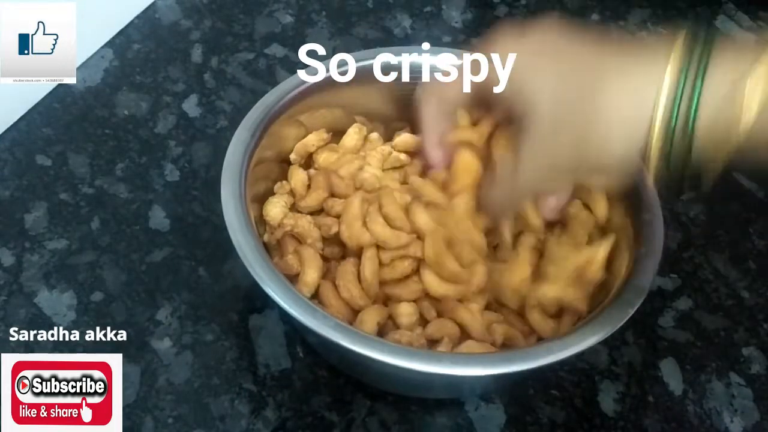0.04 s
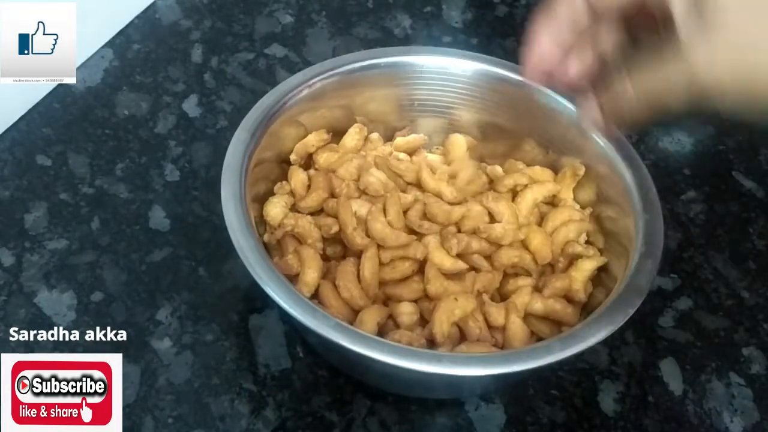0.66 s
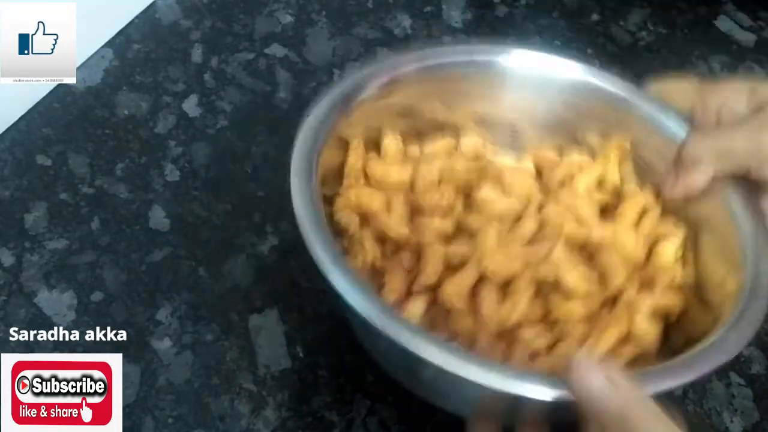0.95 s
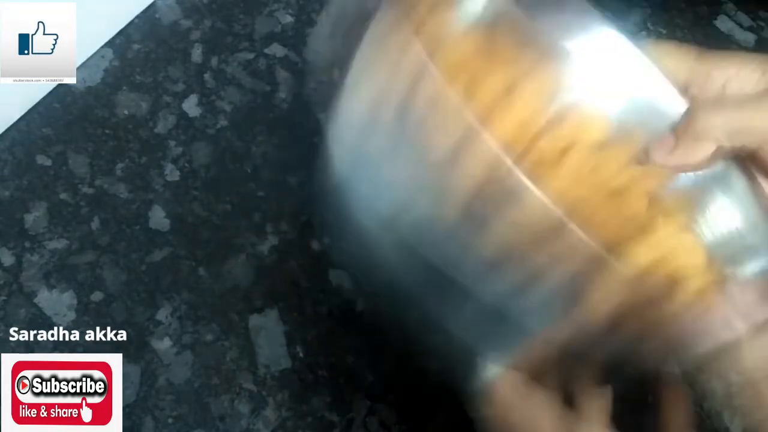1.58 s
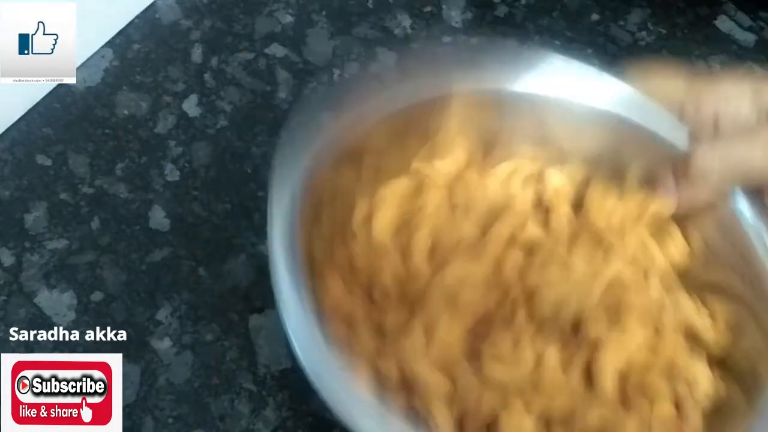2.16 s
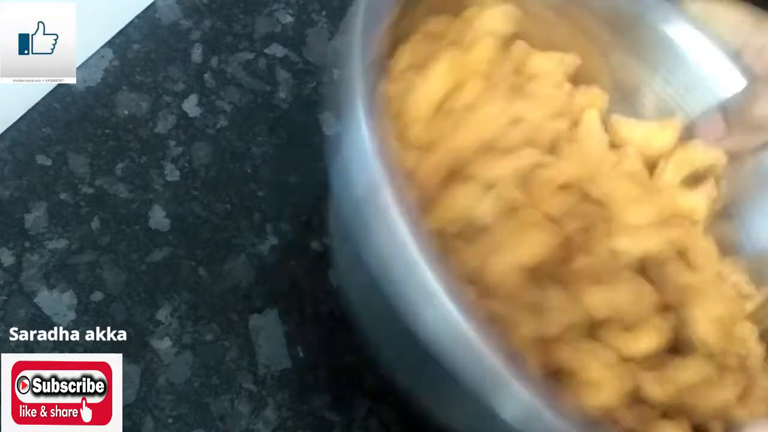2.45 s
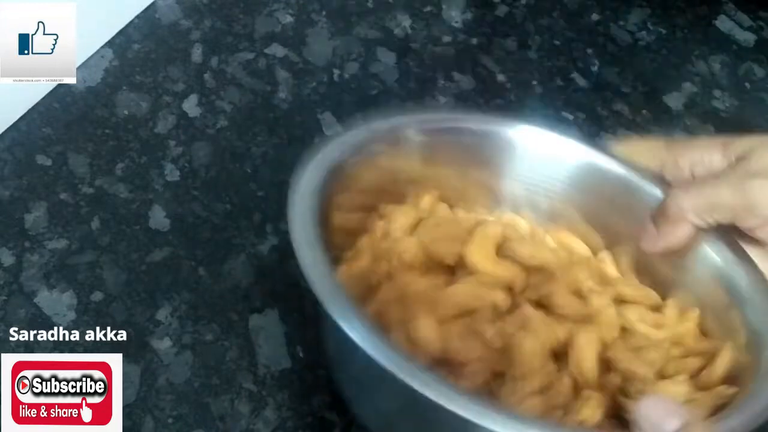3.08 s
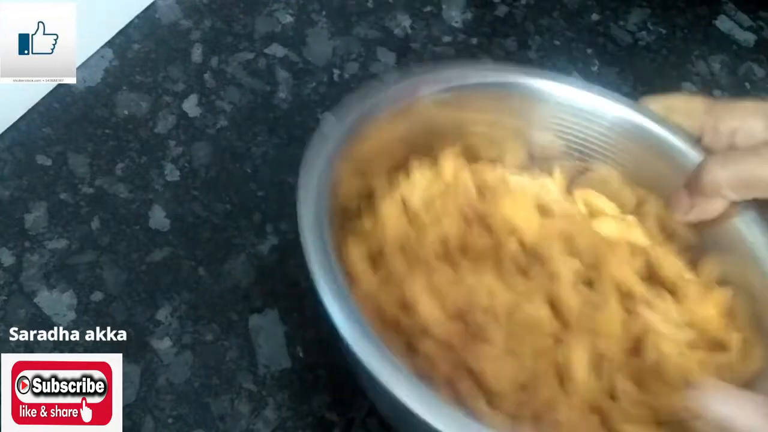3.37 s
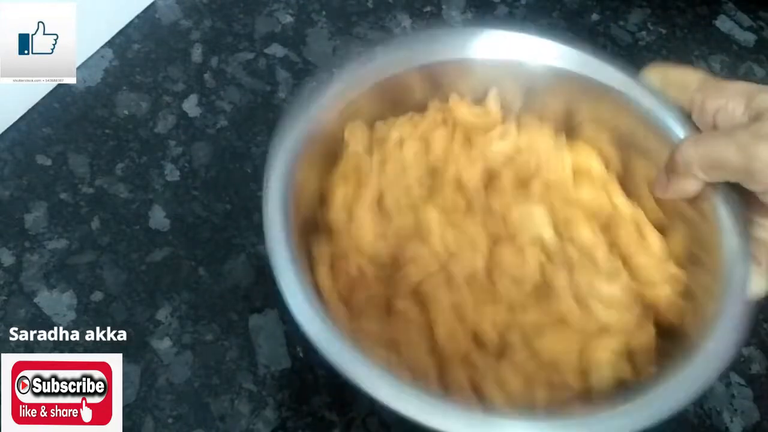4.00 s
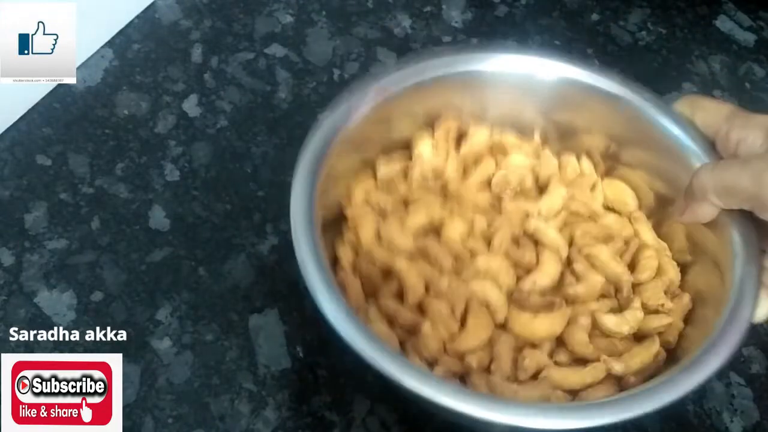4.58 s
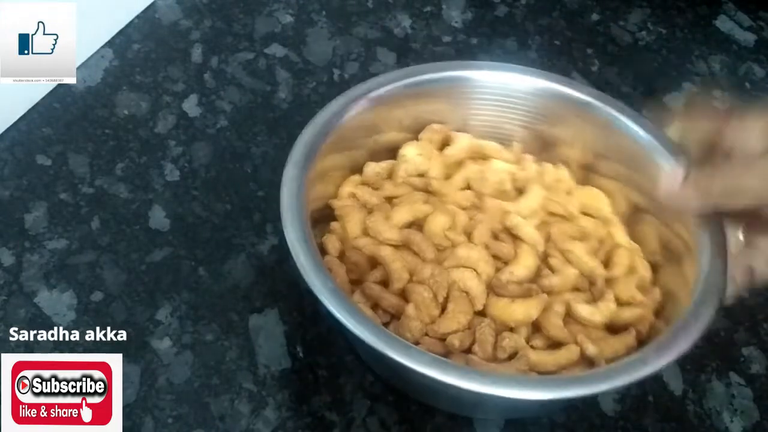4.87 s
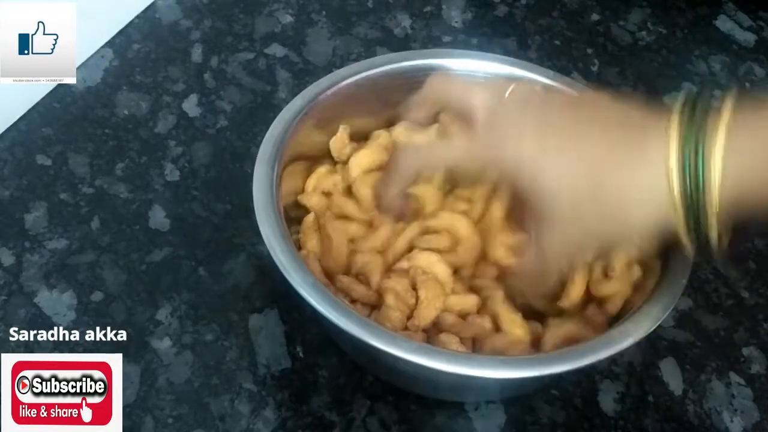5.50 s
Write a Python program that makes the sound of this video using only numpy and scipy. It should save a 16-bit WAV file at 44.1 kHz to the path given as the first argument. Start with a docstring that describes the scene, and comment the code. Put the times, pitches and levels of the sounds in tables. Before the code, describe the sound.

Close to the microphone in a kitchen with a faint hum, brittle fried snacks rustle under a hand. Five tosses follow, each landing in a loud clatter that rings the steel bowl and thumps its bottom. A soft, low puff of air hits the microphone as the pieces rattle through short, quick shakes, and one last crackly stir ends it.

```python
"""A hard-walled kitchen, one microphone close to a steel bowl of crisp fried snacks, a faint hum behind.
First a hand stirs and lets pieces drop: their hollow bodies knock, their brittle crusts crackle.
The bowl is lifted and tossed five times; each time the heap crashes back, rings the steel and thuds
on the bottom. Then quick short shakes waft air over the microphone, and last the hand digs in again."""
import sys
import numpy as np
from scipy import signal
from scipy.fft import rfft, irfft
from scipy.io import wavfile
from scipy.ndimage import uniform_filter1d, minimum_filter1d

SR = 44100
rng = np.random.default_rng(int(sys.argv[2]) if len(sys.argv) > 2 else 0)


def log_audio(samples):
    """Write samples as a 16-bit WAV file to the path given in sys.argv[1]."""
    # one column per channel
    frames = np.atleast_2d(samples).T
    # limit to full scale, then quantise
    limited = np.clip(frames, -1, 1)
    pcm = np.round(limited * 32767).astype(np.int16)
    wavfile.write(sys.argv[1], SR, pcm)


N = 244314
TIME = np.arange(N) / SR

# Levels in the tables are relative: each layer gets its own gain in the mix.
# room tone of the kitchen: (frequency [Hz], level [dB])
ROOM_TONE_SPECTRUM = [(20, 3), (40, -4.5), (100, -9), (220, -12.5), (400, -16.5), (700, -20), (1100, -22.5),
                      (2000, -26.5), (4000, -31.5), (15500, -33.5)]
# mains hum, a faint whistle and a thin electronic whine in the room: (frequency [Hz], level [dB])
HUM_TONES = [(100, -61), (200, -64.5), (715, -70), (12800, -69)]
# rumble of moving air on the microphone: (frequency [Hz], level [dB])
WAFT_SPECTRUM = [(10, 4), (16, 4.5), (24, 1.5), (40, -24), (100, -31.5), (300, -40), (2000, -87)]
# the turbulent front of that draught: (frequency [Hz], level [dB])
PUFF_SPECTRUM = [(70, -6.0), (280, -10.0), (500, -14), (1200, -20.5), (4000, -44.5)]
# reverberation off the hard walls: (frequency [Hz], time to fall 60 dB [s])
KITCHEN_DECAY = [(300, 0.31), (1000, 0.43), (3000, 0.37), (6000, 0.36), (12000, 0.42)]

# spells of rubbing, by hand or by shaking:
# (time [s], length [s], body level [dB], crust level [dB], growth [dB/s])
RUBS = [(0.0, 0.079, -40.5, -34.5, 39), (0.153, 0.07, -34.5, -26, -130), (0.35, 0.069, -61, -49.5, 10),
        (3.495, 0.065, -51, -43.5, 18), (3.624, .15, -41, -35.5, -72), (3.814, 0.707, -38.5, -34, -4.5),
        (5.234, .15, -41, -34, 59), (5.462, .08, -31, -22.5, 5)]
# pieces sliding along the wall as the bowl swings up for a toss: (time [s], level [dB])
WALL_SLIDES = [(1.24, -34), (1.68, -45), (2.567, -46), (2.604, -45), (3.025, -38.5)]
# the heap slumping at the turn of a stroke: (time [s], level [dB], body offset [dB])
HEAP_SLUMPS = [(0.063, -29, 8.5), (0.17, -21, -10), (3.637, -25.5, 2.5), (3.669, -21.5, -7),
               (3.901, -19, -8), (4.05, -9, -4.5), (4.144, -8.5, -12.5), (4.264, -15, 1), (4.35, -8.5, -10),
               (4.452, -15, -1.5), (4.519, -9.5, -8.5), (5.378, -17, -21)]
# single pieces clicking: (time [s], level [dB], body offset [dB])
PIECE_CLICKS = [(0.152, -22.5, 0.5), (0.251, -10.5, -11), (0.533, -51, 19), (2.005, -16, -2),
                (3.48, -23, -33), (3.511, -19.5, -28), (3.612, -19.5, -24), (3.762, -25, 6.5),
                (3.886, -8.5, -16), (3.925, -12.5, -1.5), (3.977, -6, -7.5), (3.996, -9, -7),
                (4.116, -5, -27), (4.248, -6.5, -31), (4.26, -8.5, 2), (4.336, -10.5, -16),
                (4.387, -12, -31), (4.51, -10, -13), (4.574, 1.5, -28), (4.757, -13, -26),
                (5.465, -10, -30), (5.486, -10.5, 1)]
# the pieces' hollow bodies: (frequency [Hz], level [dB])
BODY_SPECTRUM = [(300, -21.5), (400, -16.5), (600, -11), (800, -2), (1050, 6), (1600, 4.5), (2200, -3.5),
                 (2800, -5.5), (3700, -8.5), (4600, -21.5), (9000, -46.5)]
# their brittle crusts: (frequency [Hz], level [dB])
CRUST_SPECTRUM = [(1500, -51), (2800, -21), (3900, -16), (4500, -4), (5000, 0), (5600, -2), (6200, -2),
                  (7300, -7.5), (8800, -14), (10000, -22), (12000, -38), (15500, -46.5)]
# resonances of the bowl under a gentle stir: (frequency [Hz], level [dB])
HOLLOW_MODES = [(1023, -42), (1211, -58), (1389, -67.5), (1674, -53), (1916, -49.5), (2148, -50)]

# the heap landing after each toss:
# (time [s], gathering time [s], pouring time [s], boom level [dB], clatter level [dB], thud level [dB])
LANDINGS = [(1.274, 0.045, 0.055, -8, -6.5, -14.5), (1.714, 0.06, 0.098, -10.5, -14.5, -18.5),
            (2.175, 0.068, 0.025, -6.5, -12.5, -21.5), (2.609, 0.058, 0.069, -6.5, -13, -18),
            (3.036, 0.097, 0.036, -8, -10.5, -29)]
# hard blows on the bowl: (time [s], level [dB])
BOWL_KNOCKS = [(0.943, -18.5), (1.307, -10.5), (1.406, -9.5), (1.74, -23), (1.785, 1.5), (1.903, -1),
               (2.213, -11), (2.276, 1), (2.654, -9), (2.729, 12.5), (3.165, 2)]
# bright cracks of a few pieces fracturing at the loudest crests of the landings: (time [s], level [dB])
CREST_FIZZ = [(1.3344, -26), (1.3794, -30.5), (2.2648, -21.5), (2.2762, -25), (2.7267, -17.5),
              (3.1467, -16.5)]
# ringing modes of the steel: (frequency [Hz], level [dB])
STEEL_MODES = [(753.7, -44), (925.9, -32), (1001, -33), (1394, -41), (1583, -41), (1916, -46), (2406, -46),
               (2929, -45), (3009, -45), (3278, -46), (4011, -47), (4425, -47), (4958, -44), (5389, -44),
               (5733, -42), (6099, -42), (6535, -42), (7203, -46), (8027, -52), (8818, -55)]
# pieces crashing on each other, heard close: (frequency [Hz], level [dB])
CRASH_SPECTRUM = [(200, -40.5), (270, -30.5), (360, -22), (590, -17), (760, -9), (980, 1.5), (1300, -8.5),
                  (1700, -6), (2400, -11), (4100, -10), (6000, -3.5), (8900, -18.5), (11000, -31.5),
                  (15600, -52.5)]
# the bottom of the bowl, damped by the hands: (frequency [Hz], level [dB])
BOTTOM_SPECTRUM = [(240, -25), (313, 3), (343, -4), (377, 11), (480, -5.5), (590, -18.5), (1500, -53),
                   (5000, -86)]
# the top treble of the fracturing cracks: (frequency [Hz], level [dB])
FIZZ_SPECTRUM = [(4000, -18), (10000, -1), (13000, -7.5), (15600, 3)]


def from_db(db):
    """Decibels to gain."""
    return 10 ** (np.asarray(db) / 20)


def unit_rms(x):
    """Scale to an rms of 1."""
    return x / np.sqrt(np.mean(x ** 2) + 1e-20)


def at_hz(points, hz):
    """Read a table on a log-frequency axis."""
    points = np.array(points)
    return np.interp(np.log(hz), np.log(points[:, 0]), points[:, 1])


def through(x, response):
    """Pass x through an impulse response scaled to unit energy."""
    return signal.oaconvolve(x, response / np.linalg.norm(response))[:len(x)]


def colour(x, spectrum, size=16384):
    """Minimum-phase filter with the shape of the spectrum, falling away below its first point."""
    hz = np.maximum(np.fft.rfftfreq(size, 1 / SR), 1)
    gain = from_db(at_hz(spectrum, hz)) * np.minimum(hz / spectrum[0][0], 1) ** 2
    cepstrum = irfft(np.log(gain))[:size // 2]
    cepstrum[1:] *= 2
    return through(x, irfft(np.exp(rfft(cepstrum, size))))


def ring(hz, t60, size):
    """A sine dying by 60 dB in t60 seconds."""
    t = TIME[:size]
    return np.sin(2 * np.pi * hz * t) * np.exp(-np.log(1000) * t / t60)


def swell(s, db, rise_s, fall_s):
    """A gain that grows to its peak at time s and dies away."""
    return from_db(db) * np.exp(np.maximum(np.minimum((TIME - s) / rise_s, (s - TIME) / fall_s), -20))


def envelope(s, rise_s, hold_s, fall_s, growth=1):
    """A gain that starts at time s, grows to 1 as a power of time, holds and dies away."""
    rise = np.clip((TIME - s) / rise_s, 0, 1) ** growth
    return rise * np.exp(-np.clip((TIME - s - rise_s - hold_s) / fall_s, 0, 20))


def add(track, s, sound):
    """Mix a short sound into a track at time s."""
    at = int(s * SR)
    track[at:at + len(sound)] += sound[:N - at]


def room_tone():
    """The kitchen behind the bowl: low, even noise with a few faint steady tones."""
    air = from_db(-53.5) * colour(rng.standard_normal(N), ROOM_TONE_SPECTRUM)
    hum = sum(from_db(db) * np.sqrt(2) * np.sin(2 * np.pi * hz * TIME) for hz, db in HUM_TONES)
    return air + hum


def draught():
    """Air buffets the microphone as the shaking starts: a turbulent puff, then a deep rumble."""
    flow = from_db(-22.5) * envelope(3.636, rise_s=0.17, hold_s=0, fall_s=0.21)
    waft = flow * colour(rng.standard_normal(N), WAFT_SPECTRUM)
    front = swell(3.735, db=-38.5, rise_s=0.051, fall_s=0.1)
    return waft + front * colour(rng.standard_normal(N), PUFF_SPECTRUM)


def kitchen_reflections(x, size=22000, spots=5):
    """Counter and walls send dense reflections to the microphone, each octave dying at its own rate."""
    t, tails = TIME[:size], 0
    edges = np.geomspace(125, 16000, 8)
    for low, high in zip(edges, edges[1:]):
        octave = signal.butter(2, [low, high], "band", fs=SR, output="sos")
        band = signal.sosfilt(octave, rng.standard_normal((spots, size)))
        t60 = at_hz(KITCHEN_DECAY, np.sqrt(low * high))
        tails = tails + band * np.exp(-np.log(1000) * t / t60)
    onset = 1 - np.exp(-t / 0.00067)
    # contacts wander about the moving bowl, and every spot has reflections of its own
    knots = TIME[::512]
    wander = [np.interp(TIME, knots, rng.standard_normal(len(knots))) for _ in range(spots)]
    shares = wander / np.linalg.norm(wander, axis=0)
    return sum(through(x * share, tail * onset) for share, tail in zip(shares, tails))


def collisions(per_s, spread_db, cycles, pitches=10):
    """Random contacts of uneven force; each piece rings for a few cycles at a pitch of its own."""
    chance = np.clip(per_s / SR, 1e-4, 1)
    strength = unit_rms(from_db(spread_db * np.minimum(rng.exponential(1, N), np.pi)))
    polarity = rng.choice([-1, 1], N)
    clicks = strength * polarity * (rng.random(N) < chance) / np.sqrt(chance)
    piece, rings = rng.integers(0, pitches, N), 0
    for k, hz in enumerate(np.linspace(1500, 9000, pitches)):
        radius, angle = from_db(-60 * hz / (cycles * SR)), 2 * np.pi * hz / SR
        drive = [0, 2 * np.sqrt(1 - radius) * np.sin(angle)]
        feedback = [1, -2 * radius * np.cos(angle), radius ** 2]
        rings = rings + signal.lfilter(drive, feedback, clicks * (piece == k) + 1e-18)
    return (2 * clicks + rings) / np.sqrt(5)


def chatter(decay_s, first_db, size=1024):
    """A piece lands with one firm contact and chatters for some milliseconds as it settles."""
    force = rng.choice([-1, 1], size) * np.exp(-TIME[:size] / decay_s)
    force[0] *= from_db(first_db)
    return force / np.linalg.norm(force)


def rubbing():
    """How hard the pieces slide, rub and slump, as gains of their bodies and of their crusts."""
    body = 0
    crust = sum(swell(s, db, rise_s=0.009, fall_s=0.01) for s, db in WALL_SLIDES)
    for s, length_s, body_db, crust_db, db_per_s in RUBS:
        trend = from_db(db_per_s * np.clip(TIME - s, 0, length_s))
        effort = trend * envelope(s, rise_s=0.0026, hold_s=length_s, fall_s=0.063)
        body = body + from_db(body_db) * effort
        crust = crust + from_db(crust_db) * effort
    body, crust = from_db(-2) * body, from_db(-8) * crust
    for s, db, body_db in HEAP_SLUMPS:
        slump = swell(s, db, rise_s=0.0108, fall_s=0.016)
        body = np.hypot(body, slump * from_db(body_db - 11.5))
        crust = np.hypot(crust, slump * from_db(-12))
    return body, crust


def rustling():
    """Pieces rub and click close by: a hollow note from their bodies, a crackle from their crusts."""
    body_gain, crust_gain = rubbing()
    contacts = collisions(per_s=1100 + 18000 * crust_gain, spread_db=-0.5, cycles=12)
    body, crust = body_gain * contacts, crust_gain * contacts
    for s, db, body_db in PIECE_CLICKS:
        force = from_db(db) * chatter(decay_s=0.0055, first_db=11.5)
        add(body, s, from_db(body_db + 9) * force)
        add(crust, s, from_db(6.5) * force)
    # the air in the bowl and the pressed wall pick a few notes out of the hollow sound
    notes = sum(from_db(db) * ring(hz, t60=0.079, size=4096) for hz, db in HOLLOW_MODES)
    hollow = from_db(-8.5) * through(body, notes)
    return from_db(-2) * colour(body, BODY_SPECTRUM) + hollow + colour(crust, CRUST_SPECTRUM)


def landing(s, gather_s, pour_s, growth, fall_s, tail_db, tail_fall_s=0.1, fade_out_s=0.14):
    """Gain of one landing: the bulk arrives and stops, and its quiet tail is faded out quickly."""
    bulk = envelope(s, gather_s, pour_s, fall_s, growth)
    tail_fade = np.clip(1 - (TIME - s - gather_s - pour_s) / fade_out_s, 0, 1)
    tail = from_db(tail_db) * tail_fade * envelope(s, gather_s, pour_s, tail_fall_s, growth)
    return np.maximum(bulk, tail)


def heap_force(lift_s=0.94, lag_s=0.008):
    """The heap rains on the steel, with more contacts as the crash grows and a few hard blows."""
    # the bowl scrapes off the counter and the heap jolts
    jolt = swell(lift_s, db=0, rise_s=0.002, fall_s=0.055)
    boom, clatter = from_db(-33.5) * jolt, from_db(-32) * jolt
    # at each landing the wall booms first and the clatter lags a little
    for s, gather_s, pour_s, boom_db, clatter_db, _ in LANDINGS:
        early = landing(s, gather_s, pour_s, growth=2.2, fall_s=0.014, tail_db=-21)
        late = landing(s + lag_s, gather_s, pour_s, growth=2.6, fall_s=0.0086, tail_db=-28.5)
        boom = boom + from_db(boom_db) * early
        clatter = clatter + from_db(clatter_db) * late
    contacts = collisions(per_s=1500 + 7000 * clatter, spread_db=4, cycles=5.44)
    # the slow part of each contact bends the wall, the sharp part clatters
    slow = signal.sosfilt(signal.butter(1, 1300, fs=SR, output="sos"), contacts)
    force = from_db(-2) * boom * slow + from_db(-1) * clatter * (contacts - slow)
    for s, db in BOWL_KNOCKS:
        add(force, s, from_db(db + 9) * chatter(decay_s=0.016, first_db=5))
    return force


def steel_ring(force):
    """The bowl rings; its high modes are damped sooner by the heap lying on the wall."""
    lowest_hz, modes = STEEL_MODES[0][0], 0
    for k, (hz, db) in enumerate(STEEL_MODES):
        t60 = 0.09 * (hz / lowest_hz) ** -0.15
        modes = modes + (-1) ** k * from_db(db) * ring(hz, t60, size=12000)
    return through(force, modes)


def bottom_thud(gathered_share=0.85):
    """The heap's weight thuds on the bottom of the bowl late in each landing's gathering time."""
    weight = sum(swell(s + gathered_share * gather_s, thud_db, rise_s=0.0097, fall_s=0.034)
                 for s, gather_s, *_, thud_db in LANDINGS)
    return colour(weight * rng.standard_normal(N), BOTTOM_SPECTRUM)


def crest_fizz():
    """Short bursts of bright, spiky noise: a few pieces snap and fracture at the landings' loudest crests."""
    bursts = sum(swell(s, db, rise_s=0.0043, fall_s=0.008) for s, db in CREST_FIZZ)
    spikes = unit_rms(rng.standard_normal(N) ** 3)
    return colour(bursts * spikes, FIZZ_SPECTRUM)


def tossing():
    """Close to the microphone, pieces crash together, ring the steel and thud; the crests fizz."""
    crash = from_db(-1.5) * colour(heap_force(), CRASH_SPECTRUM)
    wall = from_db(-8.5) * steel_ring(heap_force())
    return crash + wall + from_db(-11) * bottom_thud() + from_db(-9.5) * crest_fizz()


def scene():
    """The bowl up close and the kitchen behind it, in mono."""
    snacks = tossing() + rustling()
    reflections = from_db(-7.5) * kitchen_reflections(snacks)
    return (snacks + reflections + room_tone() + draught())[None]


def record(dry):
    """After the microphone, a fast limiter holds down the loudest peaks and the top is cut."""
    ceiling, window_samples, cutoff_hz = 0.95, 48, 15800
    allowed = 1 / np.maximum(np.abs(dry) / ceiling, 1)
    gain = uniform_filter1d(minimum_filter1d(allowed, window_samples), window_samples)
    return signal.sosfilt(signal.ellip(12, 0.1, 90, cutoff_hz, fs=SR, output="sos"), dry * gain)


dry = scene()
out = record(dry)
log_audio(out)
```